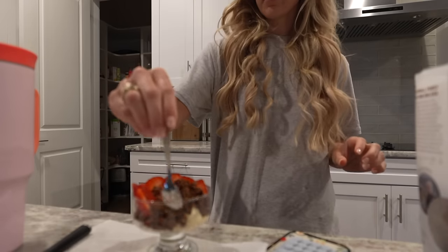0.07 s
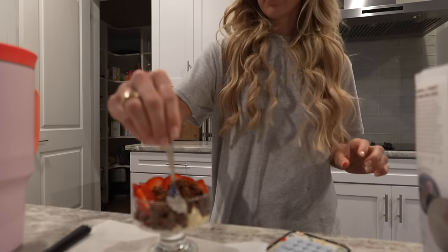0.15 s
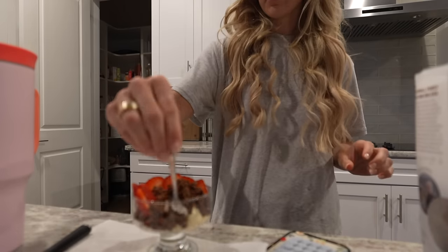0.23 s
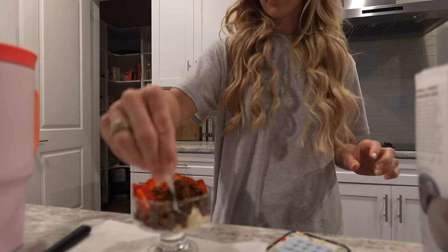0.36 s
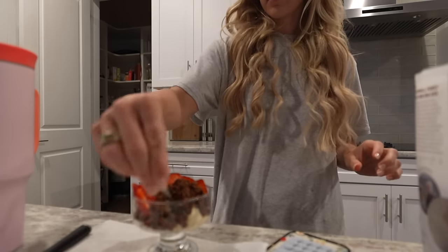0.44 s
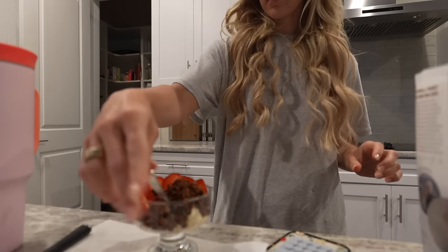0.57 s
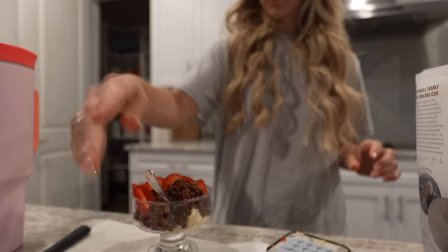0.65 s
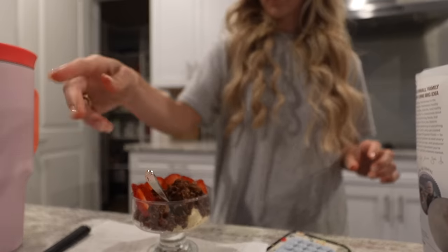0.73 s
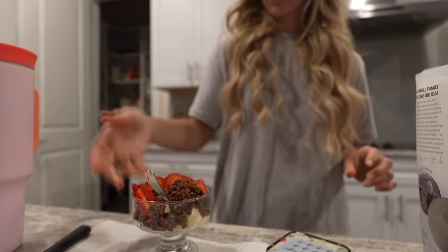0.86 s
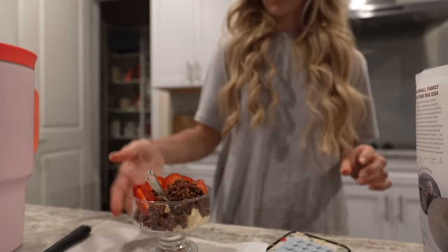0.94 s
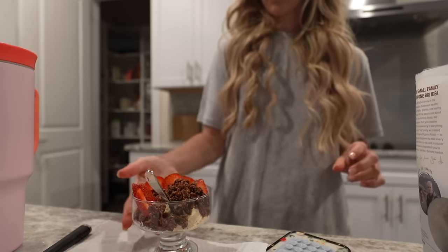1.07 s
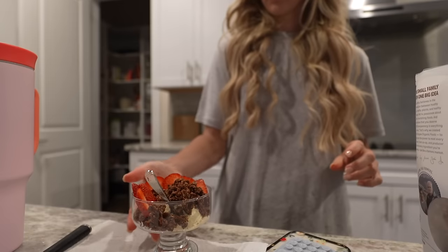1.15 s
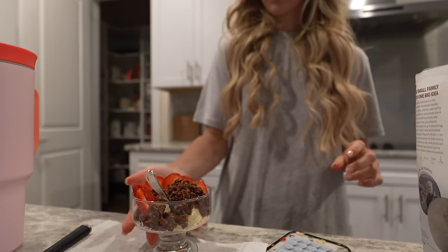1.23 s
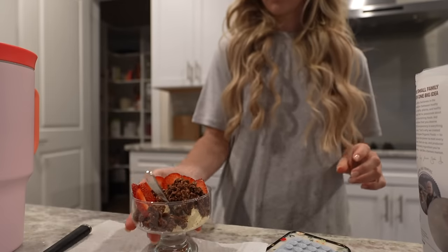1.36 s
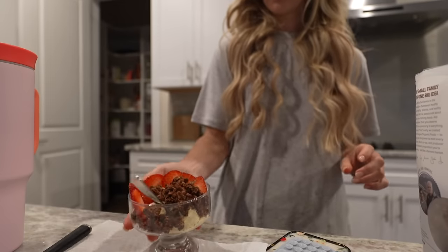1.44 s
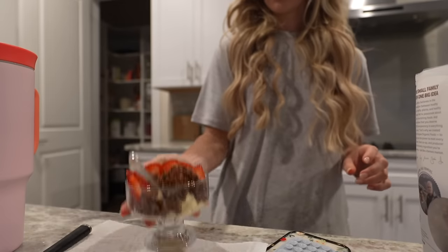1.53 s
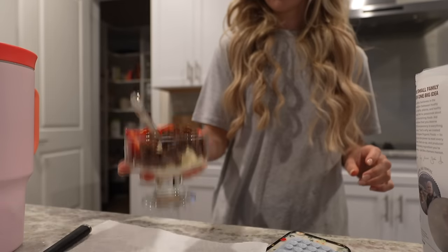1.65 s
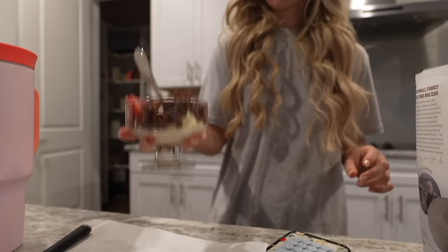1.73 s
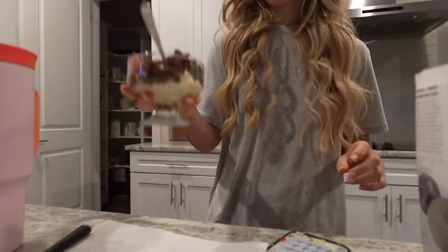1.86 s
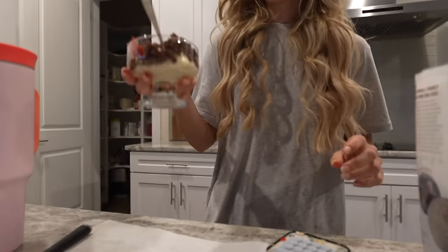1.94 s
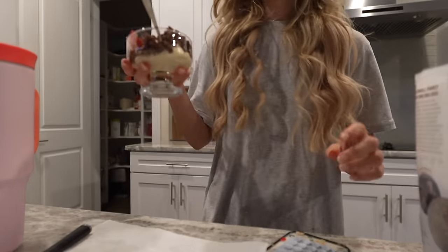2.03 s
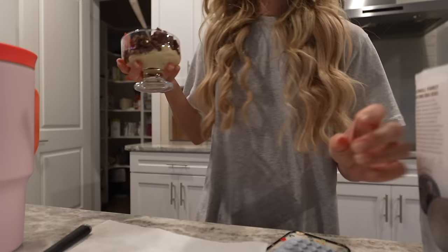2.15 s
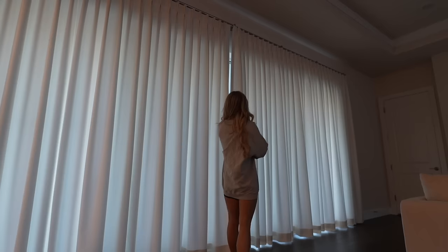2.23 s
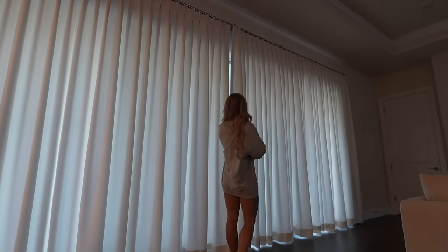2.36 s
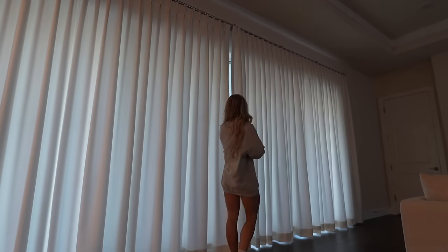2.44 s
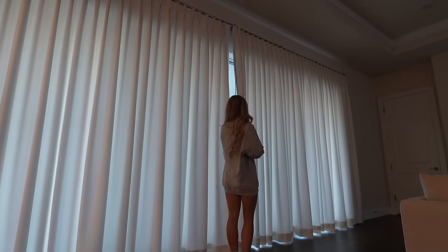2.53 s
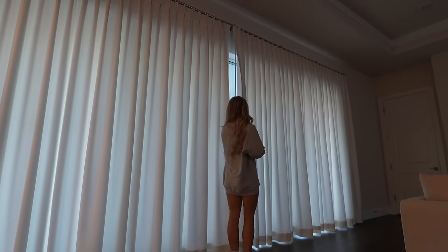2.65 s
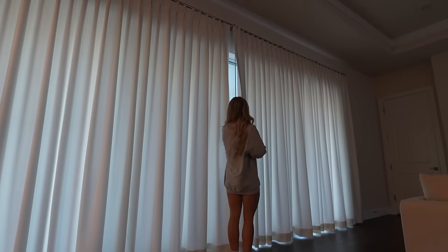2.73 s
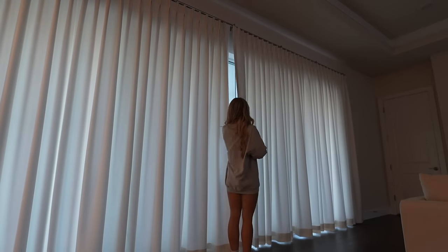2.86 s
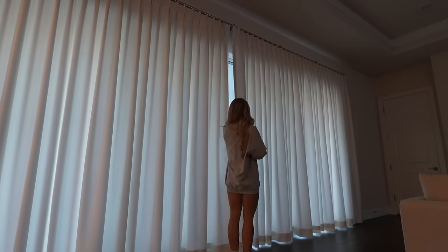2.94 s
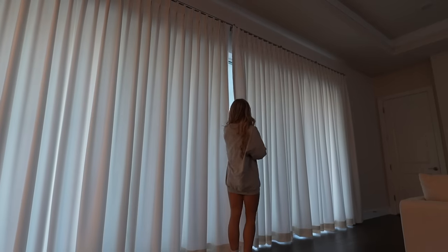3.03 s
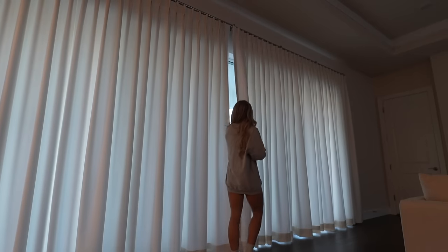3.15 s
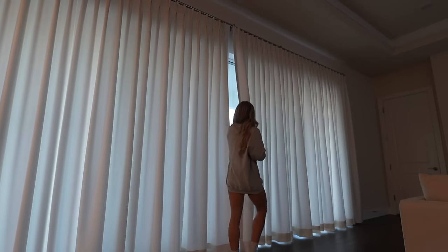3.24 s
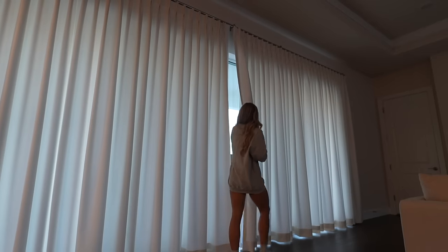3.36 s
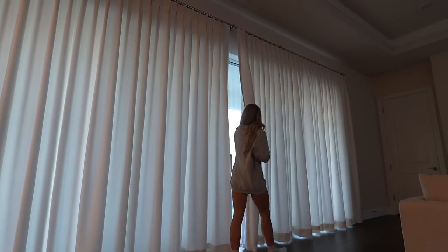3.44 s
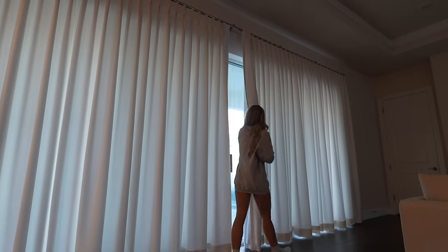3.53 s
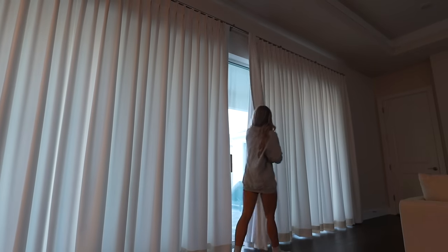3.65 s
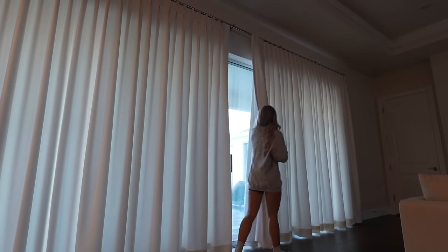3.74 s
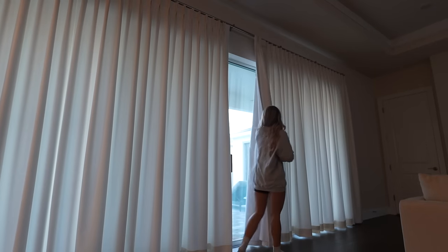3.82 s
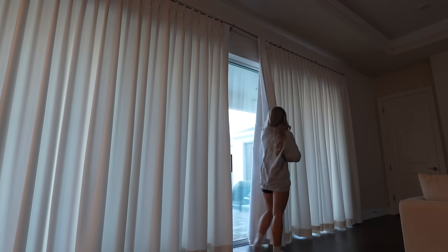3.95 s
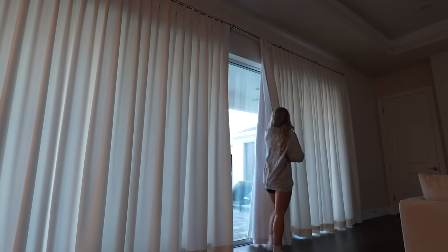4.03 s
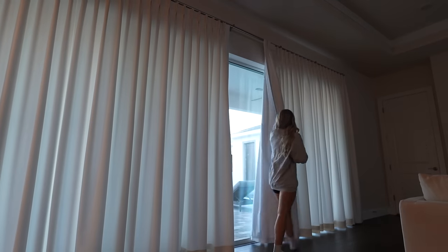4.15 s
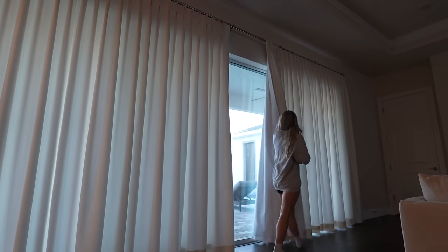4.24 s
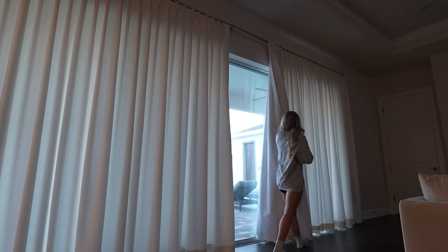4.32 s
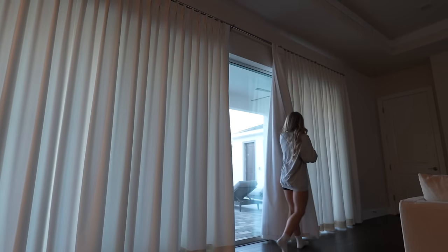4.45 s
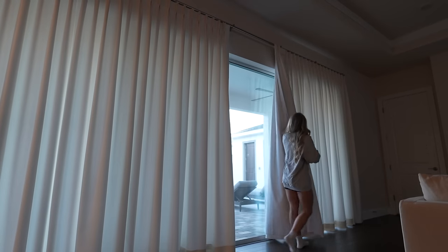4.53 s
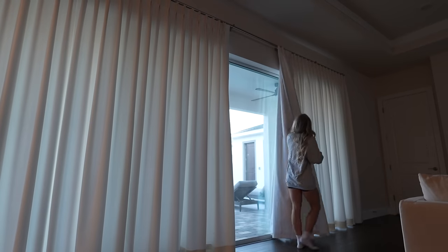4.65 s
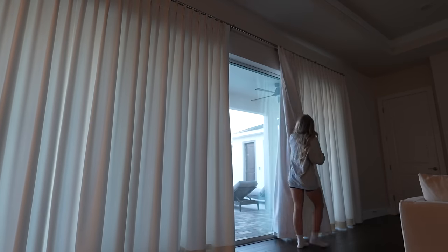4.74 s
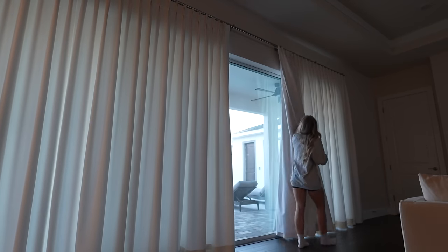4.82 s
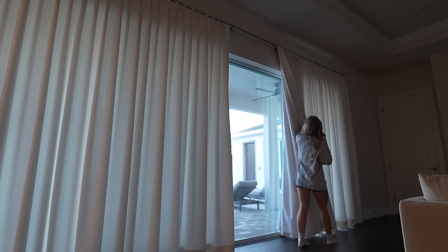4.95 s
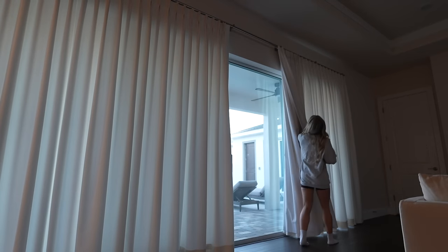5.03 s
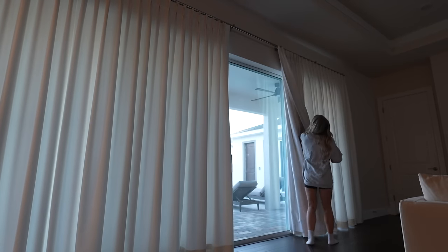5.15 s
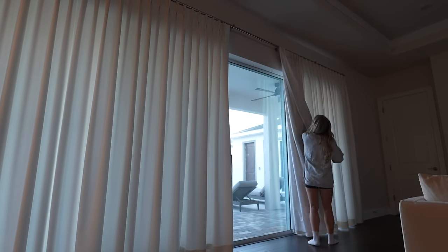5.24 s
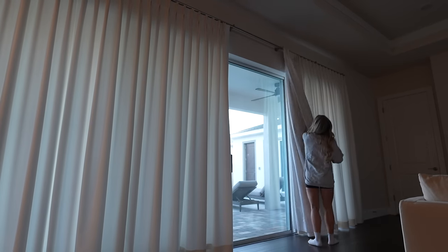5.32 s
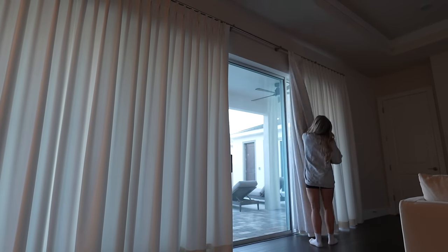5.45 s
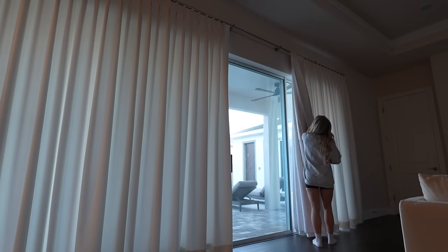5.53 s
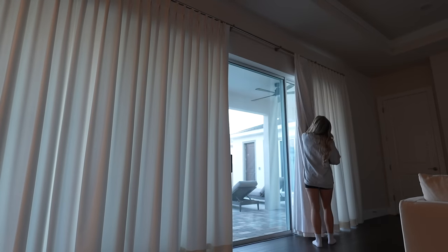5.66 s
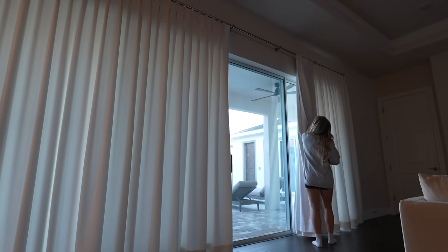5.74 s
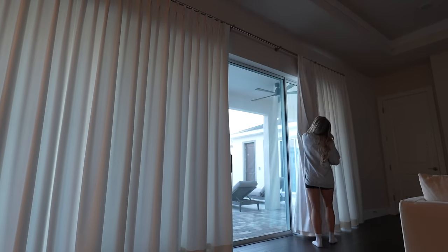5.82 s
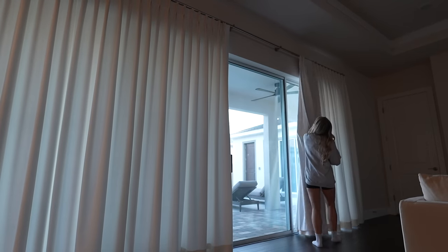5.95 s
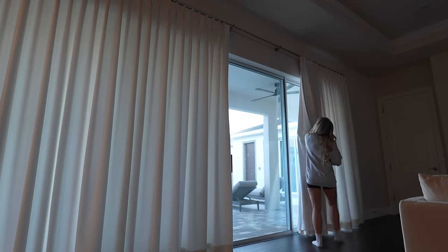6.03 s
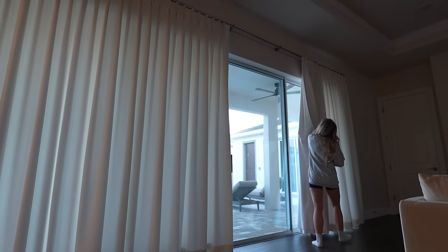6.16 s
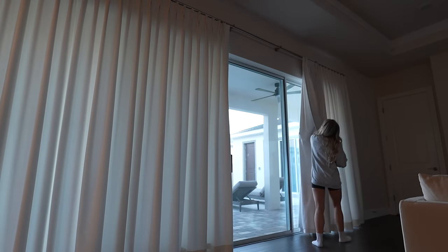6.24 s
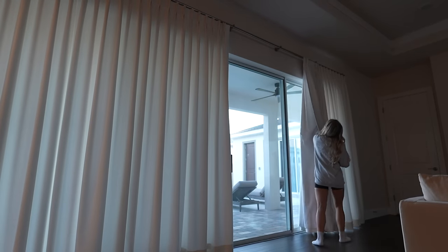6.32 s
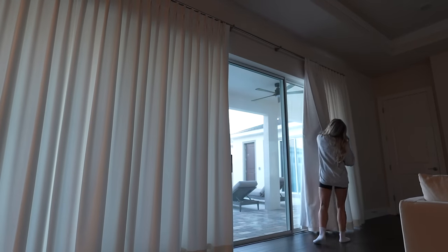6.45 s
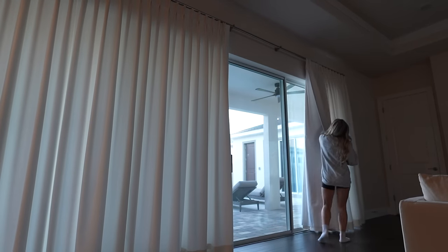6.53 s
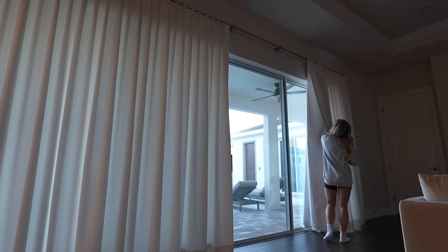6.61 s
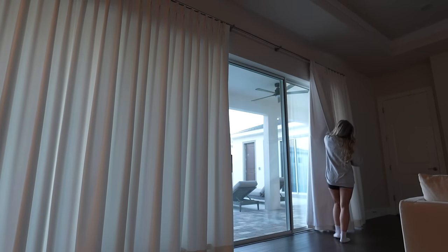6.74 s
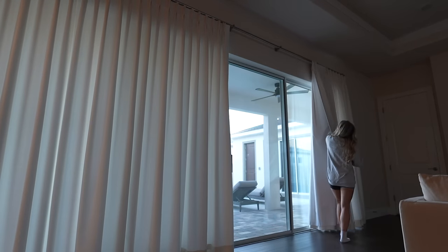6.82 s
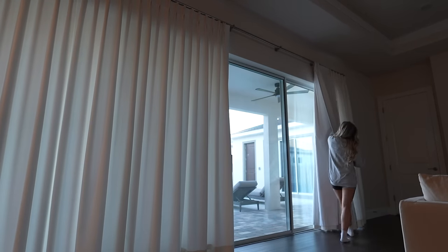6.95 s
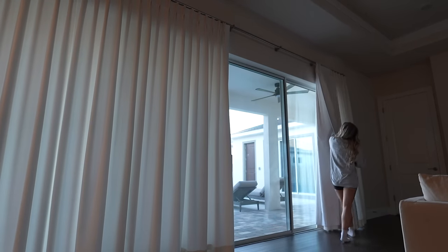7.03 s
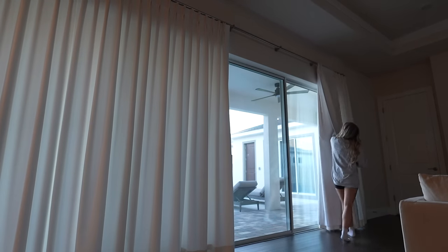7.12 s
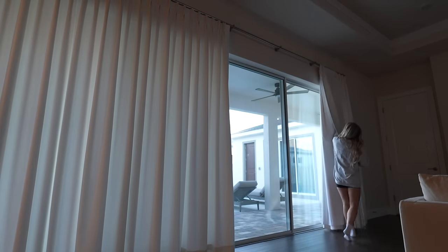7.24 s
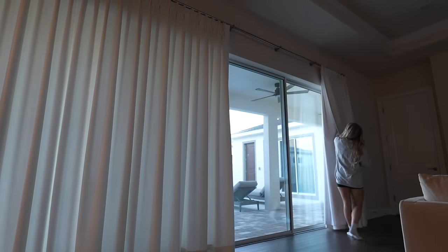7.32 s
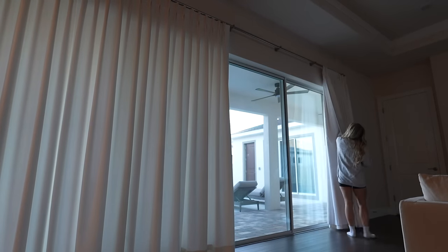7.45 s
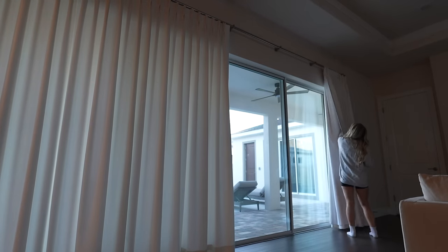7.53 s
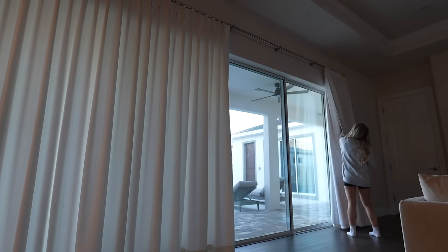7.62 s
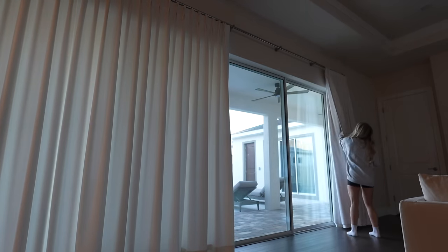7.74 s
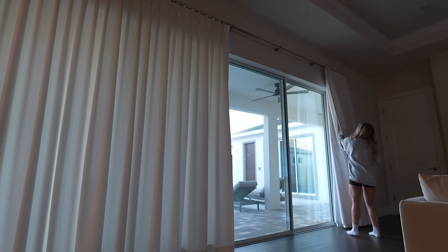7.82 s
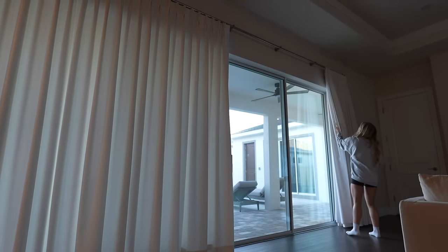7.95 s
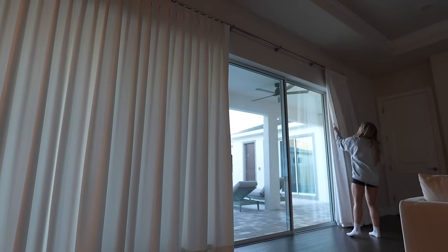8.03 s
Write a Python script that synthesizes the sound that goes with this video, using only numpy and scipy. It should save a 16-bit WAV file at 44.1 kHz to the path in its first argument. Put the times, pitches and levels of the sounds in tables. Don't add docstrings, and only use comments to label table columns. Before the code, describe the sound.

Three sharp spoon-on-glass clinks echo off kitchen surfaces, leaving soft room tone and barely audible finger taps. The place changes to a bedroom: muffled footfalls, rustling fabric, a small metallic tick. Gliders then clatter along a curtain track in three uneven hauls, with hard knocks, low thumps and fabric hiss, the last pull smoother and fading. Centred mono pickup with natural room echo.

```python
import sys
import numpy as np
from scipy import signal
from scipy.fft import rfft, irfft
from scipy.io import wavfile

SR = 44100
rng = np.random.default_rng(int(sys.argv[2]) if len(sys.argv) > 2 else 0)


def undo_db(level):
    steps = np.asarray(level, float) / 20
    return 10 ** steps


def unload_audio(sound):
    columns = np.transpose(np.atleast_2d(sound))
    steps = np.round(np.clip(columns, -1, 1) * 32767)
    wavfile.write(sys.argv[1], SR, steps.astype(np.int16))


N = 356320

# [t/s, level/dB]
PULL_SPEED = [
    [(3.33, -81), (3.45, -45.5), (3.55, -33), (3.83, -39), (4.2, -39), (4.43, -35), (4.67, -30),
     (4.73, -50.5), (4.9, -57)],
    [(5.04, -59.5), (5.23, -58), (5.265, -32.5), (5.34, -29), (5.41, -30.5), (5.62, -37.5), (5.76, -36.5),
     (6.17, -47.5), (6.42, -47)],
    [(6.57, -41), (6.65, -40), (6.7, -38), (6.83, -36), (7.36, -37.5), (7.6, -40), (7.76, -46),
     (8.08, -52.5)],
]
# [level re rattle/dB, share of speed swing, inertia/s]
DRIVEN = [
    (-15.5, 0.71, 0.02),
    (-4, 0.97, 0.031),
    (-9.5, 1.19, 0.032),
    (0.5, 1.03, 0.0029),
    (-5.5, 0.99, 0.0012),
]
# [t/s, change of lowest part/dB, change of highest part/dB, length/s]
JOLTS = [(3.414, 4, 5, 0.036), (3.464, -18, 9.5, 0.019), (3.5, 1, -1, .015), (3.526, -3, 4, 0.025),
         (3.596, -1, 2, 0.12), (4.457, -2.5, 5.5, 0.042), (4.525, 0, 3.5, 0.066), (4.642, -8, 8, 0.017),
         (4.759, 9.5, 8, 0.12), (5.246, 15, -1.5, 0.02), (5.277, 11, -10.5, 0.011), (5.327, 7.5, 2, 0.016),
         (5.373, -22, 1, 0.021), (5.62, 4.5, 0.5, 0.13), (5.78, -1, -1.5, .05), (6.54, 2.5, -2.5, 0.053),
         (6.686, 2.5, 2, .04), (7.555, 1.5, -1, 0.046)]
# [f/Hz, density/dB per Hz]
PULL_SPECTRUM = [(29, -52), (50, -5.5), (96, -20.5), (137, -3.5), (239, 0), (270, 3.5), (327, -0.5),
                 (724, -7), (967, -25), (1600, -25), (2530, -9), (3470, -13.5), (10000, -25), (14700, -31),
                 (15800, -29)]
# [f/Hz, width/Hz, lift/dB]
RAIL_MODES = [(149, 17, 7), (204, 30, 4.5), (281, 8.8, 3), (290, 16, -8), (556, 36, 3), (726, 200, -2),
              (1274, 570, 6.5), (1980, 120, 3.5), (2160, 36, 5), (2500, 140, 1.5), (3060, 31, 1.5),
              (3240, 160, 2), (3780, 150, 3), (4440, 240, -0.5)]
# [t/s, level/dB, release to -20 dB/s]
WALK = [(3.62, -40, 0.04), (4.14, -53, -1.2), (4.4, -50, -0.7), (4.56, -41.5, .3), (5.26, -32, 0.16),
        (5.72, -55, 1.1), (6.5, -48, -1.7), (6.67, -40.5, 0.07), (7.28, -54, 0.7), (7.61, -51, 0.3)]
# [t/s, level/dB, attack/s, release to -20 dB/s]
FLOOR_SWAY = (4, -53.5, .45, 0.75)
# [t/s, peak level/dB, f/Hz, width/Hz]
THUMPS = [(2.975, -52, 380, 100), (3.074, -41, 453, 140), (3.086, -36, 264, 35), (3.118, -43, 149, 25),
          (3.155, -41.5, 267, 40), (4.56, -21.5, 290, 30), (4.63, -22.5, 290, 39.7), (4.675, -25, 313, 50),
          (4.74, -37, 127, 25.2), (5.252, -33, 327, 80), (5.335, -18, 304, 120), (5.365, -25, 204, 25)]
# [f/Hz, density/dB per Hz]
CLOTH_SPECTRUM = [(35, -42), (60, -19), (146, 13), (206, 1), (255, 8), (604, -23), (817, -21), (1300, -36),
                  (4810, -30.5), (9910, -38), (15800, -38)]
# [t/s, thud level/dB, slap re thud/dB, release to -20 dB/s]
STEPS = [(2.245, -55, 3.5, 0), (2.3, -66, 3, -0.2), (2.57, -53, -4, 0.08), (2.82, -67.5, 1.5, 0.06),
         (2.97, -56.5, -19, 0.5), (3.074, -37, -37, 0), (4.92, -58, -8, 0.2), (5.08, -67, 1, 0.5)]
# [t/s, rustle level/dB, swish re rustle/dB, attack/s, release to -20 dB/s]
RUSTLES = [(2.22, -72.5, 4.5, .02, 1.3), (2.28, -65.5, -3, 0.075, -1.1), (2.55, -58, 4, 0.045, -0.03),
           (2.72, -74, -17, .15, -22), (2.96, -58.5, -17, 0.0091, 0.22), (3.06, -63, -14, 0.041, 0),
           (3.17, -75.5, 3.5, 0.061, -1.4), (3.34, -55, -25.5, 0.075, -5), (4.93, -58, 4.5, 0.025, 0.2),
           (5.06, -60, 0, .1, 2)]
# [t/s, peak level/dB]
HOOK_CLINK = [(2.9572, -37)]
# [f/Hz, width/Hz, level/dB]
HOOK_MODES = [(2030, 60, -10), (2800, 50, -10), (4300, 60, -9), (4910, 35, 1), (5590, 30, 0),
              (7070, 40, -6), (7850, 40, -10), (8790, 28, -4), (9650, 25, -3)]
# [t/s, peak level/dB, f/Hz, width/Hz]
KNOCKS = [(2.245, -50.5, 650, 500), (2.27, -54, 1100, 200), (2.568, -49, 800, 400), (2.3, -51, 600, 150),
          (2.973, -43.5, 2200, 597), (3.355, -46.5, 2580, 300), (3.357, -50, 4500, 400),
          (3.378, -57, 4200, 2000), (3.468, -20, 5000, 6000), (3.4705, -36, 3000, 3000),
          (3.525, -16, 4500, 5000), (3.528, -15, 6040, 5000), (3.53, -30.5, 670, 100),
          (4.97, -59, 8000, 4030), (5.252, -20, 3000, 2500), (5.267, -26, 3000, 1980),
          (5.32, -20, 3700, 500), (5.345, -20, 2270, 300), (4.475, -26, 5000, 5000),
          (4.53, -20, 6000, 6000), (4.687, -16.5, 2680, 200), (5.79, -18, 5000, 5000)]
CHATTER_LAGS = (13, 29, 47)
# [t/s, peak level/dB, bounce delay/ms, bounce share, contact corner f/Hz]
CLINKS = [
    (.0092, -12.5, 5.5, 0.97, 9010),
    (0.3209, -27, 2.0, 0.82, 4520),
    (0.5158, -15.5, 3.1, 0.78, 4000),
]
# [f/Hz, width/Hz, level/dB]
CLINK_MODES = [
    [(1370, 200, -8), (1940, 55, 0), (2950, 130, -7), (3320, 60, -10), (3690, 100, -9), (4420, 75, -5),
     (6190, 80, 1), (8120, 50, -2), (8320, 70, 0), (9750, 90, -9), (10500, 80, -3), (12900, 200, -15)],
    [(1370, 90, 2), (2500, 90, -6), (2990, 60, -9), (3910, 100, -11), (4460, 70, -10), (5400, 220, -1),
     (5840, 90, -1), (6890, 120, -15), (8400, 200, -14), (9900, 200, -20)],
    [(1330, 120, -12), (2120, 90, -12), (2540, 120, 1), (2930, 90, -9), (3480, 120, -7), (3950, 90, -12),
     (5130, 130, -12), (5430, 150, -8), (6320, 160, -9), (7260, 80, -16), (8580, 150, -8), (10600, 100, -7),
     (13100, 250, -22)],
]
# [t/s, peak level/dB, f/Hz, width/Hz]
TAPS = [(1.13, -45, 4560, 5000), (1.141, -53, 6540, 2970), (1.279, -72, 778, 201), (1.339, -66, 930, 90.5),
        (1.483, -70, 1090, 88), (1.53, -73, 945, 90), (1.96, -67, 940, 88.6)]
# [f/Hz, T60/s]
KITCHEN_T60 = [(500, 0.97), (2500, 0.69), (6000, 0.65), (14000, 0.43)]
BEDROOM_T60 = [(100, 0.62), (500, 0.65), (3000, 0.72), (14000, 0.63)]
# [f/Hz, density/dB per Hz]
KITCHEN_AIR = [(12, -36.5), (20, -19), (65, -6), (126, -4.5), (149, -7), (192, -2.5), (300, -8), (539, -27),
               (603, -23), (1210, -30.5), (1950, -38), (7860, -38.5), (15800, -28)]
BEDROOM_AIR = [(12, -39), (20, -6), (88, 5), (181, -9.5), (375, -10.5), (969, -29.5), (1790, -19),
               (4500, -34), (7650, -41), (9830, -25), (15800, -35)]

CRUISE_DB = -38
JOLT_ATTACK_S, WALK_ATTACK_S, STEP_ATTACK_S = 0.0073, 0.046, 0.028
RUSTLE_HOLD = 0.73
RAIL_PLACES = 5
LIFT_S, LIFT_ATTACK_S, LIFT_HOLD_S, LIFT_RELEASE_S = 1.846, 0.11, 0.12, 0.3
LIFT_RING_DB, SLEEVE_DB = -75.5, -77.5
ROOM_CHANGE_S = 2.225
KITCHEN_AIR_DB, BEDROOM_AIR_DB, CHANNEL_HISS_DB = -62.5, -61.5, -91


def curtain():
    contacts = grains(per_s=4000, spread_db=2.7)
    rattle = coloured(contacts, PULL_SPECTRUM, RAIL_MODES)
    wall, *parts = driven()
    bright = layered(rattle, [230, 900, 1800, 5000, 16200], parts, flicker_db=0.55)
    walk = sum(swell(s, db, WALK_ATTACK_S, fall_s) for s, db, fall_s in WALK)
    boom = layered(rattle, [70, 230], [wall + walk], flicker_db=1.0)
    slab = band(band(rattle, 55, 91), 55, 91)
    sway = swell(*FLOOR_SWAY) * rms_one(slab)
    thumps = band(ticks(THUMPS), 63, 450)
    return undo_db(-2.5) * (bright + boom + sway) + thumps


def driven():
    speed_db = in_time(sum(PULL_SPEED, [])) - CRUISE_DB
    low_db, high_db = 0, 0
    for s, low, high, length_s in JOLTS:
        jolt = swell(s, 0, JOLT_ATTACK_S, length_s, length_s / 2)
        low_db = low_db + low * jolt
        high_db = high_db + high * jolt
    gains = []
    for height, (db, share, inertia_s) in zip(np.linspace(0, 1, len(DRIVEN)), DRIVEN):
        r = np.exp(-1 / (max(inertia_s, 1e-4) * SR))
        steady = signal.lfilter([1 - r], [1, -r], undo_db(CRUISE_DB + db + share * speed_db))
        gains.append(steady * undo_db((1 - height) * low_db + height * high_db))
    return gains


def gather():
    cloth = coloured(grains(per_s=9000, spread_db=1.2), CLOTH_SPECTRUM)
    thud, slap, rustle, swish = 0, 0, 0, 0
    for s, db, slap_db, fall_s in STEPS:
        step = swell(s, db, STEP_ATTACK_S, fall_s)
        thud = thud + step
        slap = slap + undo_db(slap_db) * step
    for s, db, swish_db, rise_s, fall_s in RUSTLES:
        rub = swell(s, db, rise_s, fall_s, RUSTLE_HOLD * rise_s)
        rustle = rustle + rub
        swish = swish + undo_db(swish_db) * rub
    edges_hz = [80, 600, 1500, 6000, 15800]
    return undo_db(-2.5) * layered(cloth, edges_hz, [thud, slap, rustle, swish], flicker_db=0.3)


def hooks():
    (s, db), = HOOK_CLINK
    ring = struck(s, db + 3, HOOK_MODES, crack_db=-28)
    hook = band(chatter(ring, share=0.4), 2600, 11000)
    return hook + chatter(ticks(KNOCKS), share=0.6)


def spoon():
    hits = 0
    for (s, db, bounce_ms, share, dull_hz), modes in zip(CLINKS, CLINK_MODES):
        lifted = [(hz, width, level + 10 * np.log10(1 + (hz / dull_hz) ** 2)) for hz, width, level in modes]
        contact = signal.butter(1, min(dull_hz, 18000), fs=SR)
        click = struck(s, 0, lifted, crack_db=-16)[:SR]
        hit = chatter(signal.lfilter(*contact, click), share=0.4)
        hit = hit + share * np.roll(hit, round(bounce_ms * SR / 1000))
        hits = hits + undo_db(db) * hit / np.abs(hit).max()
    bright = band(band(hits, 1300, 17000), 1250, 18000)
    return np.pad(bright, (0, N - SR))


def lift():
    white = rng.standard_normal(N)
    gesture = swell(LIFT_S, 0, LIFT_ATTACK_S, LIFT_RELEASE_S, LIFT_HOLD_S)
    foot = undo_db(LIFT_RING_DB) * rms_one(band(white, 2090, 2470))
    sleeve = undo_db(SLEEVE_DB) * rms_one(band(white, 2600, 11000))
    return gesture * (foot + sleeve)


def ticks(rows):
    return sum(struck(s, db, [(hz, width, 0)], crack_db=-70) for s, db, hz, width in rows)


def struck(s, peak_db, modes, crack_db):
    blow = np.zeros(SR // 5)
    blow[0] = 1
    for hz, width, db in modes:
        r, w = np.exp(-np.pi * width / SR), 2 * np.pi * hz / SR
        zeros = (1 - r * r) / 2 * np.array([1, 0, -1])
        ring = signal.lfilter(zeros, [1, -2 * r * np.cos(w), r * r], blow)
        blow = blow + (undo_db(max(db - crack_db, 0)) - 1) * ring
    out = np.zeros(N + len(blow))
    start = round(s * SR)
    out[start:start + len(blow)] = undo_db(peak_db) * blow / np.abs(blow).max()
    return out[:N]


def chatter(blow, share):
    for lag in CHATTER_LAGS:
        taps = np.zeros(lag + 1)
        taps[[0, -1]] = 1, -share
        blow = signal.lfilter(taps[::-1], taps, blow)
    return blow


def grains(per_s, spread_db):
    sizes = undo_db(spread_db * np.minimum(rng.exponential(1, N), 5)) * rng.choice([-1, 1], N)
    contacts = rms_one(sizes * (rng.random(N) < per_s / SR))
    return contacts + 0.64 * rng.standard_normal(N)


def layered(source, edges_hz, gains, flicker_db):
    shared = drift(5.6) + 0.51 * drift(38)
    out = 0
    for low, high, gain in zip(edges_hz, edges_hz[1:], gains):
        flicker = undo_db(flicker_db * (shared + 1.8 * drift(20)))
        out = out + rms_one(band(source, low, high)) * gain * flicker
    return out


def swell(s, db, attack_s, release_s, hold_s=0):
    t = np.arange(0, N + 20, 20) / SR - s
    rise = np.clip(t / max(attack_s, 1e-3), 0, 1) ** 2
    falling_s = np.maximum(t - attack_s - hold_s, 0)
    gain = rise * undo_db(db - 20 * falling_s / max(release_s, 1e-3))
    return np.repeat(gain, 20)[:N]


def drift(rate_hz):
    r = np.exp(-80 * np.pi * rate_hz / SR)
    slow = signal.lfilter([1], [1, -2 * r, r * r], rng.standard_normal(N // 40 + 2002))[2000:]
    return np.interp(np.arange(N) / 40, np.arange(len(slow)), rms_one(slow))


def coloured(x, spectrum, modes=()):
    hz = np.maximum(np.fft.rfftfreq(len(x), 1 / SR), 1)
    lift_db = sum(db / (1 + (2 * (hz - f) / width) ** 2) for f, width, db in modes)
    return irfft(rfft(x) * undo_db(at_hz(spectrum, hz) + lift_db), len(x))


def band(x, low_hz, high_hz):
    return signal.sosfilt(signal.butter(3, [low_hz, high_hz], "band", fs=SR, output="sos"), x)


def rms_one(x):
    return x / np.sqrt(np.mean(x ** 2) + 1e-20)


def in_time(rows):
    s, values = np.transpose(rows)
    return np.interp(np.arange(N) / SR, s, values, left=-200)


def at_hz(points, hz):
    f, values = np.transpose(points)
    return np.interp(np.log(hz), np.log(f), values)


def bedroom(x):
    place = np.clip((np.arange(N) / SR - 3) / 5, 0, 1) * (RAIL_PLACES - 1)
    out = x
    for k in range(RAIL_PLACES):
        share = np.cos(np.pi / 2 * np.clip(place - k, -1, 1))
        out = out + echoes(x * share, BEDROOM_T60, first_echo_s=0.01345, wet_db=-3)
    return out


def kitchen(dish):
    wall = 0.35 * np.roll(dish, round(0.0108 * SR))
    return dish + wall + echoes(dish, KITCHEN_T60, first_echo_s=0.0105, wet_db=-0.5)


def echoes(x, t60s, first_echo_s, wet_db):
    t, tail = np.arange(SR) / SR, 0
    edges_hz = 40 * 2. ** np.arange(0, 9.1)
    white = rng.standard_normal((2, SR))
    for k, (low, high) in enumerate(zip(edges_hz, edges_hz[1:])):
        decay = undo_db(-60 * t / at_hz(t60s, np.sqrt(low * high)))
        tail = tail + band(white[k % 2], low, high) * decay
    tail = tail * np.clip((t - first_echo_s) / 0.00017, 0, 1)
    return undo_db(wet_db) * signal.oaconvolve(x, tail / np.sqrt(np.sum(tail ** 2)))[:N]


def air():
    later = np.clip((np.arange(N) / SR - ROOM_CHANGE_S) / 0.013, 0, 1)
    kitchen_air = undo_db(KITCHEN_AIR_DB) * rms_one(coloured(rng.standard_normal(N), KITCHEN_AIR))
    bedroom_air = undo_db(BEDROOM_AIR_DB) * rms_one(coloured(rng.standard_normal(N), BEDROOM_AIR))
    return (1 - later) * kitchen_air + later * bedroom_air


def scene():
    first = kitchen(spoon() + ticks(TAPS)) + lift()
    second = bedroom(hooks() + gather() + curtain())
    return np.tile(first + second + air(), (2, 1))


def band_limit(x):
    return signal.sosfilt(signal.butter(12, 16310, fs=SR, output="sos"), x)


def record(dry):
    white = rng.standard_normal(N)
    hiss = rms_one(band(white, 80, 900)) + 0.5 * rms_one(band(white, 6000, 8500))
    trace = undo_db(CHANNEL_HISS_DB) * hiss * [[1], [-1]]
    top_cut = signal.cheby2(20, 60, 15900, fs=SR, output="sos")
    mix = signal.sosfilt(top_cut, dry + trace)
    return band_limit(mix)


dry = scene()
out = record(dry)
unload_audio(out)
```